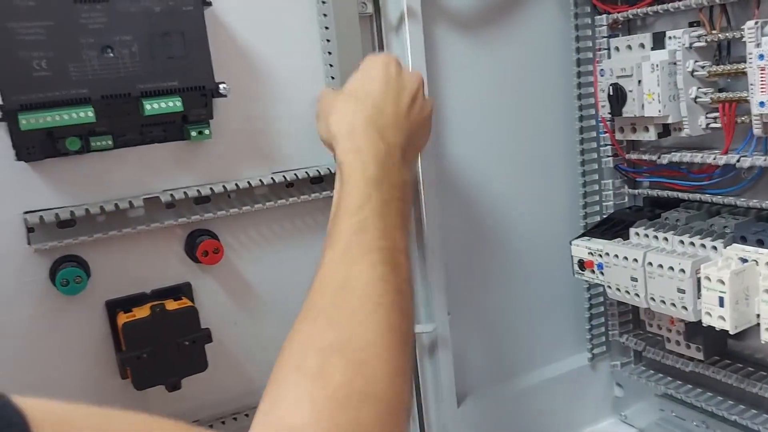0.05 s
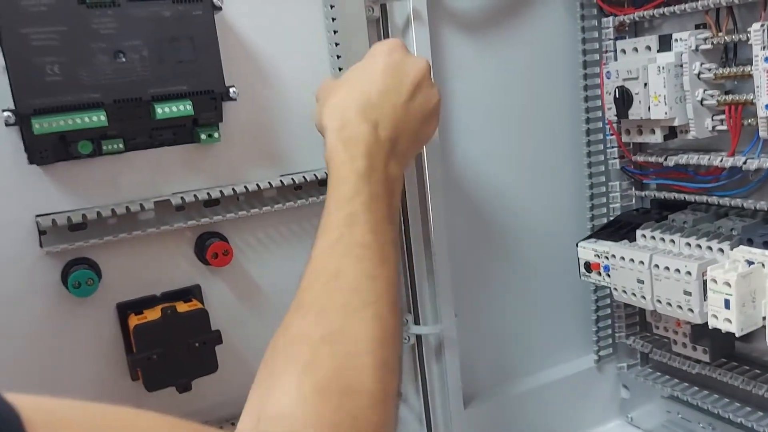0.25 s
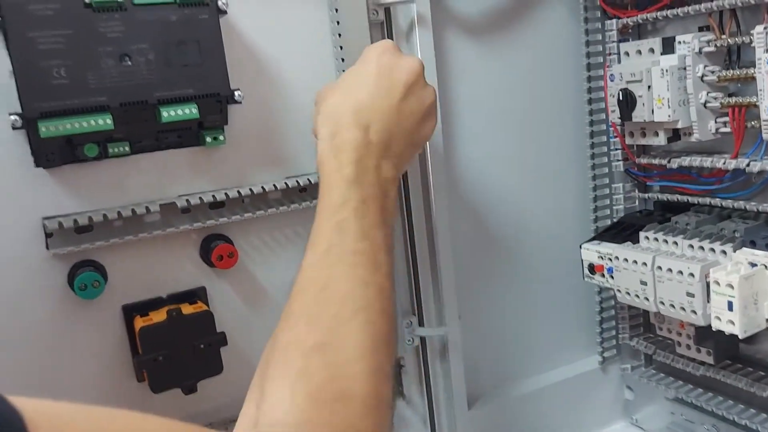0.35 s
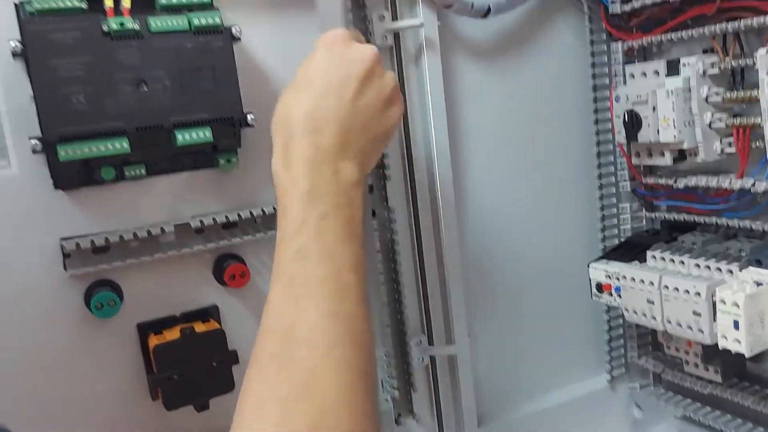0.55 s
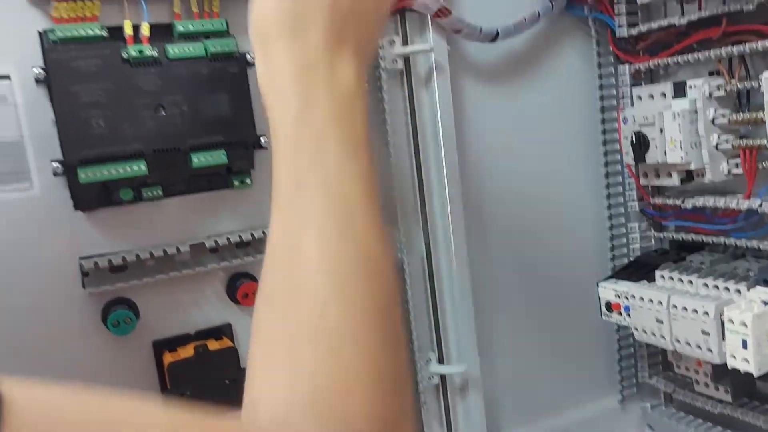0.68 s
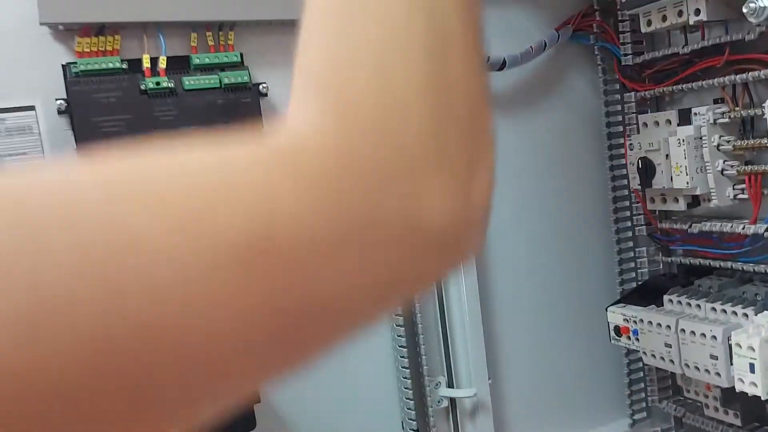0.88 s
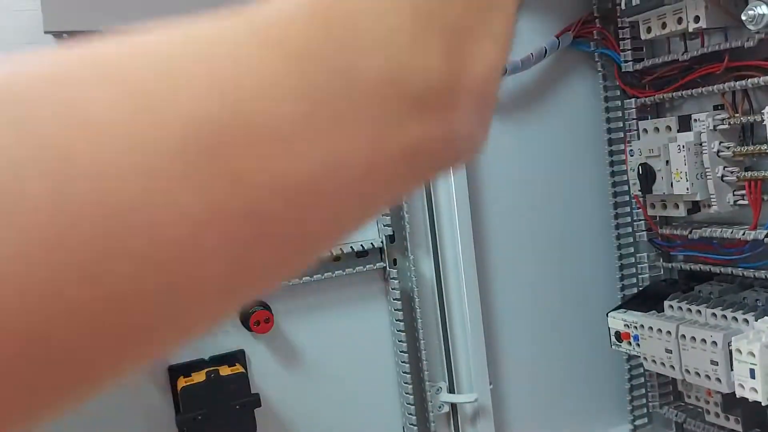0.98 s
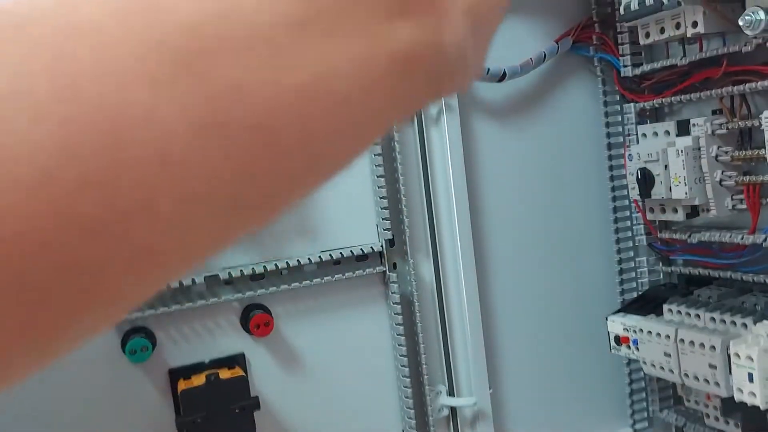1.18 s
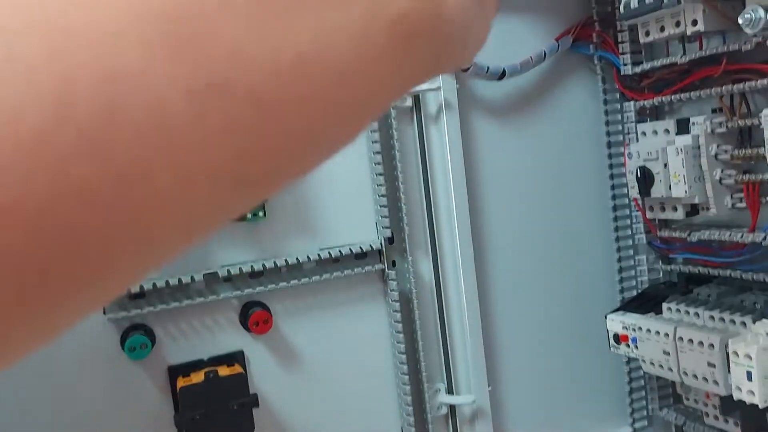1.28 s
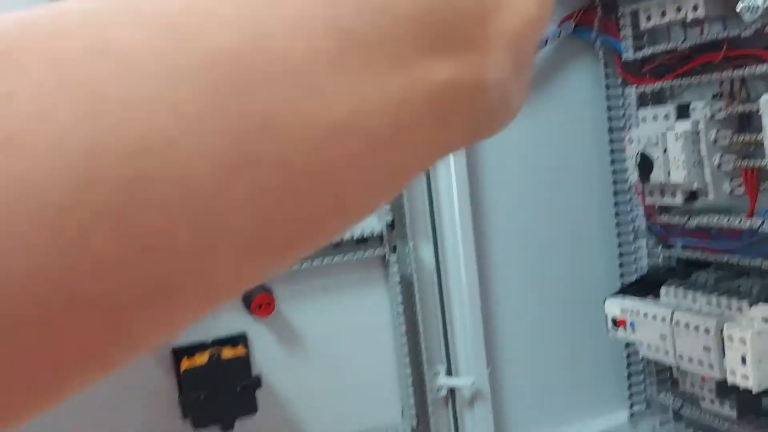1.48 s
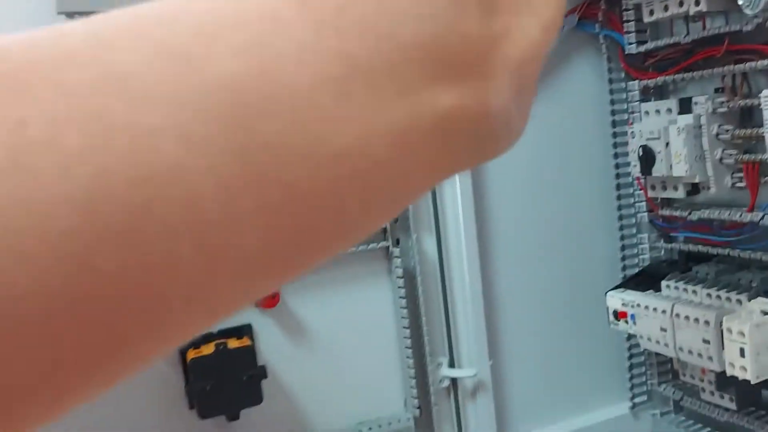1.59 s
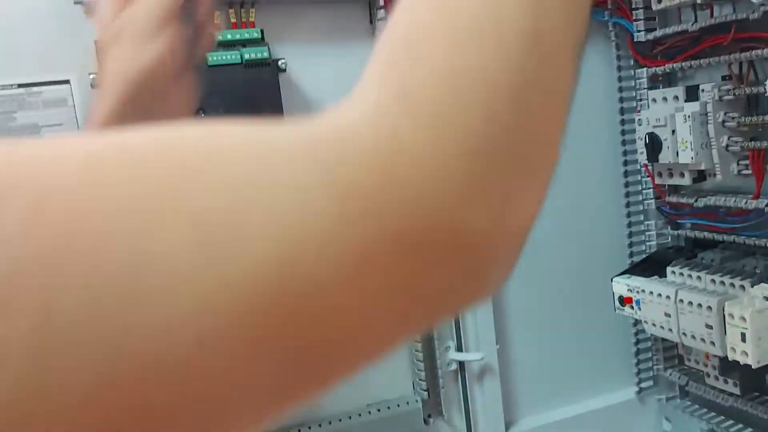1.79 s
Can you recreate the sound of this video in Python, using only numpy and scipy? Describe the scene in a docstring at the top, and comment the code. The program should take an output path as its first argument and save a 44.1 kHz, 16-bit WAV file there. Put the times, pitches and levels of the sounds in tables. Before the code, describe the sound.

Sharp plastic clacks sound in a quiet room as a hand presses a part into a metal cabinet. A short lull follows, then brief scrapes, another knock and light scuffs, with dull panel thuds and a faint low rumble underneath.

```python
"""A hand works on a stiff plastic part inside a steel electrical cabinet, in a quiet room.
First the hand rubs faintly and the part knocks, then it snaps home with a triple clack at about 0.4 s.
After a pause it is pushed along in short grating slips from 1.1 s, knocks again and settles with
light scuffs. Each contact thuds, shakes the sheet-steel panel and echoes briefly in the cabinet
and the room, while a low rumble swells and fades underneath."""
import sys
import numpy as np
from scipy import signal
from scipy.fft import rfft, irfft
from scipy.io import wavfile
from scipy.ndimage import uniform_filter1d

SR = 44100
rng = np.random.default_rng(int(sys.argv[2]) if len(sys.argv) > 2 else 0)


def inscribe(sig):
    """Save sig as 16-bit PCM at rate SR to the path in sys.argv[1].

    A 1-D sig is mono; a 2-D sig holds one channel per row.
    Samples are clipped to [-1, 1] before scaling.
    """
    pcm = np.round(np.clip(np.atleast_2d(sig).T, -1, 1) * 32767)
    wavfile.write(sys.argv[1], SR, pcm.astype(np.int16))


N = 81585
TIME = np.arange(N) / SR

# Sharp hits on the plastic. Each row: start in seconds, thud level in dB, thud pitch in Hz,
# hollow ring level in dB, low, middle and high noise levels in dB, ping pitch in Hz.
CLACK_EVENTS = [(0.098, -37, 310, -46, -48.5, -44, -48, 937),
                (0.1755, -52, 300, -50, -36, -36.5, -38, 4630),
                (0.198, -46, 220, -35.5, -36, -34.5, -60, 2300),
                (0.2121, -15.5, 250, -41, -27, -48, -30.5, 1050),
                (0.2348, -21, 139, -47, -36, -42, -63, 4500),
                (0.3104, -22.5, 330, -32.5, -32, -35, -42.5, 2600),
                (0.3923, -15.5, 250, -24.5, -25, -25, -42, 2532),
                (0.4075, -38, 200, -23, -22, -10, -12, 1945),
                (0.4230, -14, 331, -33, -31, -13.5, -17, 2515),
                (0.429, -49, 300, -42, -41.5, -20.5, -16.5, 3930),
                (0.4495, -26.5, 304, -35.5, -45, -27, -40, 5200),
                (1.1268, -37, 310, -31, -59, -29, -26.5, 8000),
                (1.2043, -43, 310, -36, -36.5, -22, -36, 4100),
                (1.2105, -35, 307, -25.5, -20, -28, -40, 1650),
                (1.2434, -22.5, 159, -24.5, -14, -34, -39, 1600),
                (1.4498, -37.5, 320, -42, -46, -33, -51, 4050),
                (1.5373, -54, 242, -49, -51, -38.5, -72, 1680)]
# Short slides of the plastic. Each row: start and length in seconds, thud level in dB,
# thud pitch in Hz, low, middle and high noise levels in dB, ping pitch in Hz.
SLIP_EVENTS = [(0.188, 0.034, -27.5, 225, -36.5, -41, -53, 874),
               (0.211, 0.0076, -34.5, 495, -36, -33.5, -36.5, 7540),
               (1.116, 0.0077, -33, 296, -38, -28.5, -37, 6170),
               (1.126, 0.012, -22, 309, -27, -23, -31.5, 735),
               (1.163, 0.005, -20, 351, -37, -32.5, -43, 4497),
               (1.183, 0.043, -51, 201, -37, -25, -33, 3480),
               (1.2006, 0.013, -29.5, 288, -23, -20, -30, 4230),
               (1.2177, 0.0044, -19.5, 326, -19.5, -31, -42, 1160),
               (1.2243, 0.0094, -30, 285, -37, -23.5, -43, 3800),
               (1.241, 0.01, -16.5, 290.4, -26.5, -26, -41, 1560),
               (1.27, 0.008, -22, 392, -36, -26.5, -34, 4100),
               (1.288, 0.013, -21.5, 320, -37.5, -33, -44, 940),
               (1.319, 0.0027, -20.5, 334, -63, -37, -55, 606.5),
               (1.433, 0.018, -52, 300, -42, -40.5, -50.5, 4270),
               (1.4717, 0.0047, -34.5, 326, -37, -37.5, -59, 2500),
               (1.565, 0.02, -27.5, 288.6, -38, -44.5, -75, 1100),
               (1.629, 0.007, -35, 313, -48, -45, -81, 4700),
               (1.647, 0.0064, -49, 247, -44, -45, -71, 3560)]


def from_db(db):
    """Turn decibels into a gain; from_db(-60 * t / fade_s) falls by 60 dB in fade_s seconds."""
    return 10 ** (np.asarray(db) / 20)


def unit_power(x):
    """Scale a signal to an average power of one."""
    return x / np.sqrt(np.mean(x ** 2) + 1e-20)


def at_hz(points, hz, column=1):
    """Read a value between the rows of a table, with octaves evenly spaced."""
    table = np.array(points)
    return np.interp(np.log(np.maximum(hz, 1)), np.log(table[:, 0]), table[:, column])


def level_curve(points):
    """Join points of seconds and dB into a gain that changes over time."""
    return from_db(np.interp(TIME, *np.transpose(points)))


def band(x, low, high):
    """Keep the frequencies between low and high, in Hz."""
    edges = [low, min(high, SR / 2 - 1000)]
    return signal.sosfilt(signal.butter(2, edges, "band", fs=SR, output="sos"), x)


def stereo_noise(width, size):
    """White noise; width 0 is the same in both ears, width 1 is unrelated."""
    mid, side = rng.standard_normal((2, size))
    return (mid + width * side * np.array([[1], [-1]])) / np.sqrt(1 + width ** 2)


def coloured_noise(colour):
    """Steady noise with the given tone colour, narrow in the bass and wide in the treble."""
    hz = np.fft.rfftfreq(N, 1 / SR)
    width = at_hz([(300, 0.22), (900, 0.7)], hz)
    mid, side = rfft(rng.standard_normal((2, N))) * from_db(at_hz(colour, hz))
    return unit_power(irfft(mid + width * side * np.array([[1], [-1]]), N))


def resonate(x, peaks):
    """Boost a band around each pitch at which the part likes to vibrate."""
    out = x
    for hz, width_hz, boost_db in peaks:
        decay = np.exp(-np.pi * width_hz / SR)
        feedback = [1, -2 * decay * np.cos(2 * np.pi * hz / SR), decay ** 2]
        peak = signal.lfilter(np.array([1, 0, -1]) * (1 - decay ** 2) / 2, feedback, x + 1e-18)
        out = out + (from_db(boost_db) - 1) * peak
    return out


def ring(kicks, hz, fade_s):
    """Each kick starts a pure tone that dies away."""
    decay, step = from_db(-60 / (fade_s * SR)), 2 * np.pi * hz / SR
    return signal.lfilter([0, np.sin(step)], [1, -2 * decay * np.cos(step), decay ** 2], kicks + 1e-18)


def add(out, start_s, sound):
    """Mix a sound in at its start time."""
    start = int(start_s * SR)
    out[:, start:start + sound.shape[1]] += sound[:, :N - start]


def delay_left(x, lag_s):
    """A sound from the right reaches the left ear a little later."""
    phase_shift = np.exp(-2j * np.pi * np.fft.rfftfreq(N, 1 / SR) * lag_s)
    return np.array([irfft(rfft(x[0]) * phase_shift, N), x[1]])


def room_air():
    """The quiet room gives a steady, mostly deep noise."""
    # Tone colour of the room. Each row: frequency in Hz, relative level in dB.
    colour = [(25, -17), (50, -17.5), (90, 3), (170, -9.5), (340, -8.5), (480, -20.5), (1000, -25.5),
              (3300, -38.5), (5000, -33.5), (7500, -45.5), (16000, -43)]
    return from_db(-49.5) * coloured_noise(colour)


def low_rumble():
    """A deep noise swells and fades around the knocks."""
    # Loudness of the rumble. Each row: time in seconds, level in dB.
    loudness = [(0, -50.5), (.12, -48.5), (.25, -35.5), (.36, -48), (.47, -35.5), (.6, -54), (1.2, -71),
                (1.28, -37), (1.42, -47), (1.6, -42), (1.85, -55.5)]
    # Its tone colour. Each row: frequency in Hz, relative level in dB.
    colour = [(25, -22.5), (50, -12), (75, -3.5), (130, -5), (330, -8.5), (600, -17), (2000, -54)]
    return level_curve(loudness) * coloured_noise(colour)


def hand_rubbing():
    """Skin and sleeve rub with a faint, uneven hiss."""
    # Loudness of the rubbing. Each row: time in seconds, level in dB.
    loudness = [(0, -53.5), (.12, -49.5), (.29, -61.5), (.38, -70), (.6, -69), (.72, -66.5), (.83, -59.5),
                (1.0, -79.5), (1.09, -57), (1.66, -57.5), (1.85, -62.5)]
    # Its tone colour. Each row: frequency in Hz, relative level in dB.
    colour = [(200, -3), (900, 7), (2500, 2.5), (5200, -0.5), (8500, -8), (12000, -2.5), (16000, -5)]
    flutter_db = 2.0 * unit_power(uniform_filter1d(rng.standard_normal(N), size=200))
    return level_curve(loudness) * from_db(flutter_db) * coloured_noise(colour)


def room_echo(x):
    """The cabinet and room send back dense echoes; each octave fades at its own speed."""
    # The echoes. Each row: frequency in Hz, level in dB, fade time in seconds.
    echoes = [(80.9, -10.5, 0.29), (269.8, -8, 0.34), (647, 2, 0.22), (2003.6, -12.5, 0.71),
              (5041, -10, 0.21), (9128, -11.5, 0.42), (14780, -12.5, 0.27)]
    delay_s, build_s = 0.0054, 0.002
    t, response = TIME[:SR * 3 // 5], 0
    build_up = 1 - np.exp(-np.maximum(t - delay_s, 0) / build_s)
    edges_hz = 40 * 2. ** np.arange(10)
    for low, high in zip(edges_hz, edges_hz[1:]):
        hz = np.sqrt(low * high)
        envelope = build_up * from_db(-60 * t / at_hz(echoes, hz, column=2))
        width = 0.91 * min(1, hz / 500)   # narrower in the bass
        tail = band(stereo_noise(width, len(t)), low, high) * envelope
        tail *= np.sqrt(4 * (high - low) / SR / np.sum(tail ** 2))   # equal energy per Hz
        response = response + from_db(at_hz(echoes, hz)) * tail
    return signal.fftconvolve(x, response, axes=1)[:, :N]


def thuds(events, rise_s, fade_s=0.08):
    """The part thuds at a pitch set by the grip; returns the sound and the kicks it gives the panel."""
    out, kicks, t = np.zeros((1, N)), np.zeros(N), TIME[:SR // 5]
    envelope = (1 - np.exp(-t / rise_s)) * from_db(-60 * t / fade_s)
    for start_s, db, hz in events:
        add(out, start_s, from_db(db) * envelope * np.sin(2 * np.pi * hz * t)[None])
        kicks[int(start_s * SR)] += from_db(db)
    return out[0], kicks


def steel_panel():
    """Every clack and slip gives a dull thud and sets the steel sheet ringing."""
    # The sheet's own tones. Each row: pitch in Hz, relative level in dB after a clack
    # and after a slip, fade time in seconds.
    tones = [(71, -19, -7, 0.8), (144, -7.5, -15, 0.28), (298.6, -8, -10, 0.36), (352, -9, -15, 0.16),
             (480, -20, -9, .1), (637, -33.5, -17.5, .15), (909, -31, -21.5, 0.12)]
    clack_thuds, clack_kicks = thuds([(s, db, hz) for s, db, hz, *_ in CLACK_EVENTS], rise_s=0.0006)
    slip_thuds, slip_kicks = thuds([(s, db, hz) for s, _, db, hz, *_ in SLIP_EVENTS], rise_s=0.005)
    sheet = np.zeros(N)
    for k, (hz, clack_db, slip_db, fade_s) in enumerate(tones):
        kicks = from_db(clack_db) * clack_kicks + from_db(slip_db) * slip_kicks
        sheet += (-1) ** k * ring(kicks, hz, fade_s)   # neighbouring tones start in opposite directions
    low_cut = signal.butter(4, 80, "high", fs=SR, output="sos")   # the sheet gives off little deep bass
    return signal.sosfilt(low_cut, clack_thuds + slip_thuds + from_db(-6.5) * sheet)


def contact_noise(envelope, levels_db, roughness_db, width):
    """Uneven surfaces meet in many tiny impacts, heard as low, middle and high bands of noise."""
    size, grain_s = len(envelope), 0.00048
    bands_hz = (600.6, 2320), (2130, 6250), (6500, 15300)
    bumps = unit_power(uniform_filter1d(rng.standard_normal(size), int(grain_s * SR)))
    grains = from_db(roughness_db * bumps) * envelope
    grains *= np.sqrt(np.sum(envelope ** 2) / np.sum(grains ** 2))   # roughness adds no energy
    out = np.zeros((2, size))
    for db, (low, high) in zip(levels_db, bands_hz):
        gain = from_db(db) * np.sqrt(SR / 2 / (high - low))
        out += gain * band(grains * stereo_noise(width, size), low, high)
    return out


def plastic_slips():
    """The plastic breaks loose with a sharp bite, grates for a moment, then rings out."""
    # Resonances of the sliding part and its metal rail. Each row: pitch in Hz, width in Hz, boost in dB.
    peaks = [(637, 120, 10.2), (1647, 94, 5.9), (4300, 1600, 3.8), (11450, 690, 8.4)]
    rise_s, fade_s, bite_fade_s = 0.0012, 0.083, 0.0085
    out, t = np.zeros((2, N)), TIME[:SR // 10]
    bite = from_db(-3 - 60 * t / bite_fade_s)
    for start_s, length_s, _, _, *levels_db, ping_hz in SLIP_EVENTS:
        slide = (1 - np.exp(-t / rise_s)) * from_db(-60 * np.maximum(t - length_s, 0) / fade_s)
        burst = contact_noise(slide + bite, levels_db, roughness_db=3, width=0.8)
        ping_peak = (ping_hz, 0.12 * ping_hz, 5)   # each contact point favours one pitch
        add(out, start_s, resonate(burst, [ping_peak]))
    return from_db(-5.5) * resonate(out, peaks)


def plastic_clacks():
    """The plastic is struck: a short crack and a clean ping, while its hollow body rings on."""
    # Resonances of the struck part and its metal rail. Each row: pitch in Hz, width in Hz, boost in dB.
    peaks = [(4020, 50, 8.5), (5070, 280, 6), (10450, 130, 9)]
    # The hollow part's own tones. Each row: pitch in Hz, relative level in dB, fade time in seconds.
    tones = [(700, -6.5, 0.053), (920, -3.5, 0.056), (1155, -5, 0.048), (1835, 0, .03)]
    fade_s, crack_fade_s, ping_fade_s = 0.045, 0.0095, 0.028
    out, kicks, t = np.zeros((2, N)), np.zeros(N), TIME[:SR // 10]
    envelope = from_db(-60 * t / fade_s) + from_db(-3.5 - 60 * t / crack_fade_s)
    for start_s, _, _, hollow_db, *levels_db, ping_hz in CLACK_EVENTS:
        burst = contact_noise(envelope, levels_db, roughness_db=-5.5, width=0.58)
        ping = from_db(hollow_db + 5 - 60 * t / ping_fade_s) * np.sin(2 * np.pi * ping_hz * t)
        add(out, start_s, from_db(-4) * resonate(burst, peaks) + ping)
        kicks[int(start_s * SR)] += from_db(hollow_db)
    for k, (hz, db, ring_s) in enumerate(tones):
        out += (-1) ** k * from_db(db) * ring(kicks, hz, ring_s)
    return out


def scene():
    """Plastic and panel echo over the background; above the bass they lean slightly to the right."""
    clacks = plastic_clacks()
    slips = delay_left(plastic_slips(), lag_s=0.00016)
    panel = steel_panel()
    echo = room_echo(from_db(-1) * clacks + from_db(0.5) * slips + from_db(-6) * panel)
    contacts = clacks + slips + panel + echo
    bass = signal.sosfilt(signal.butter(1, 170, fs=SR, output="sos"), contacts)
    treble = (contacts - bass) * from_db([[-0.5], [0.5]])   # left, right
    return bass + treble + room_air() + low_rumble() + hand_rubbing()


def record(dry):
    """Round off the loudest peaks and cut the very highest treble."""
    ceiling, cutoff_hz = 0.8, 15900
    rounded = ceiling * np.tanh(dry / ceiling)
    return signal.sosfilt(signal.ellip(12, .1, 80, cutoff_hz, fs=SR, output="sos"), rounded)


dry = scene()
out = record(dry)
inscribe(out)
```